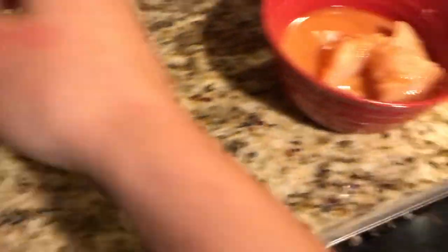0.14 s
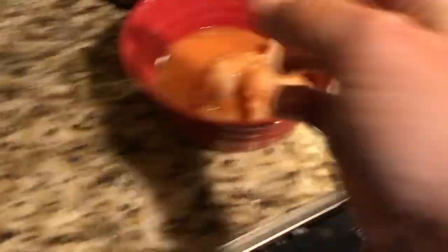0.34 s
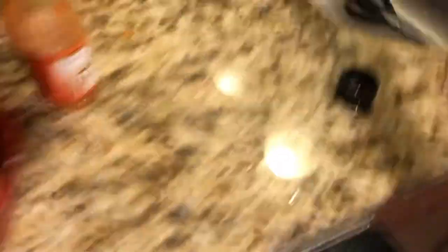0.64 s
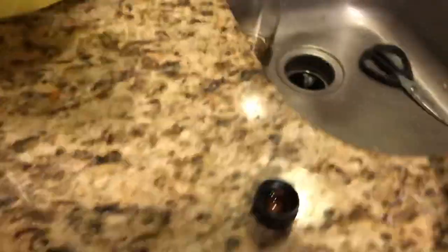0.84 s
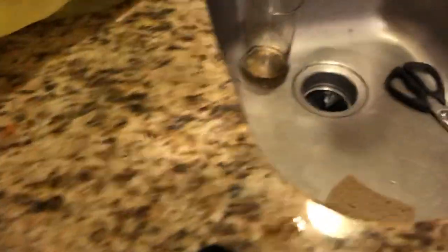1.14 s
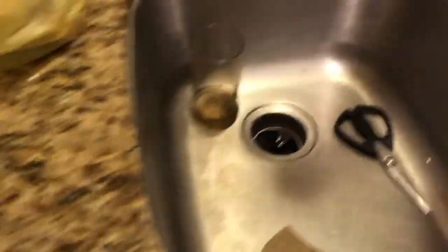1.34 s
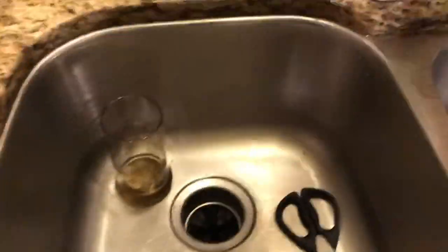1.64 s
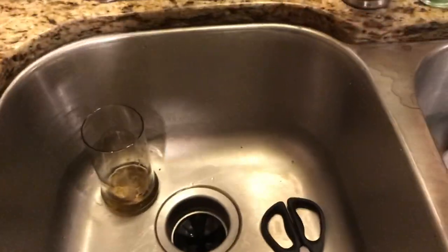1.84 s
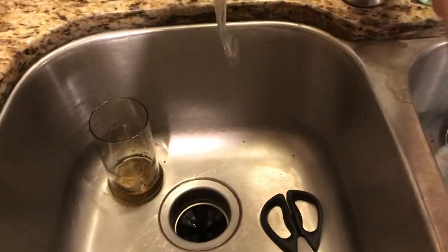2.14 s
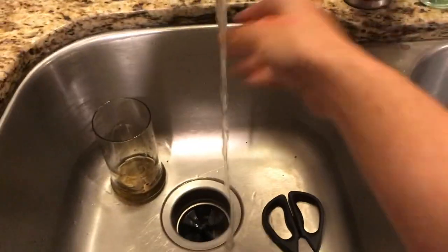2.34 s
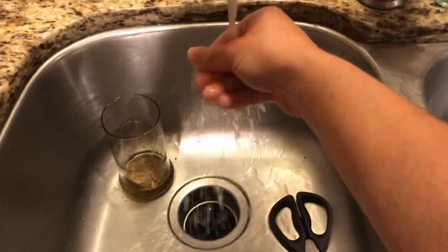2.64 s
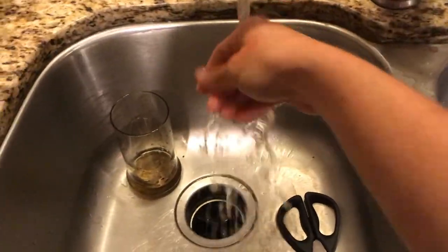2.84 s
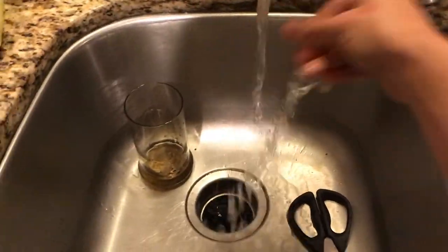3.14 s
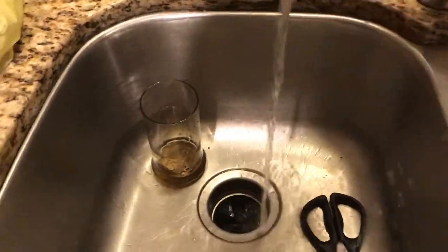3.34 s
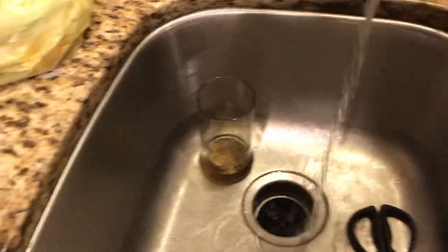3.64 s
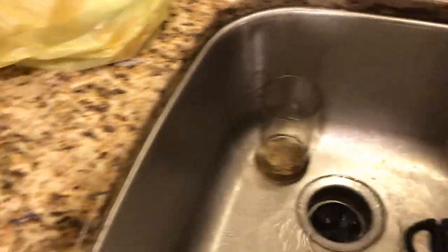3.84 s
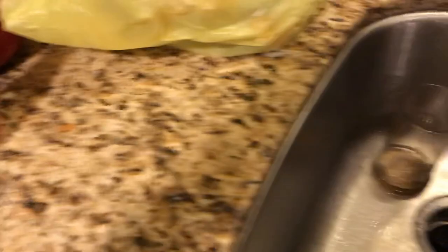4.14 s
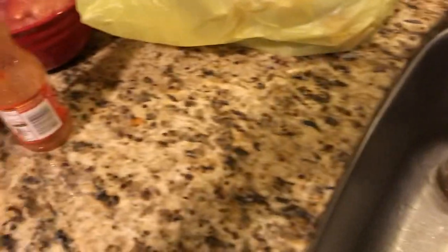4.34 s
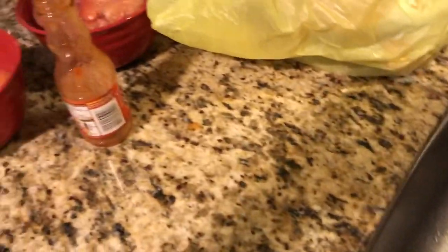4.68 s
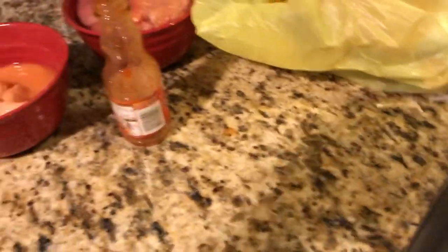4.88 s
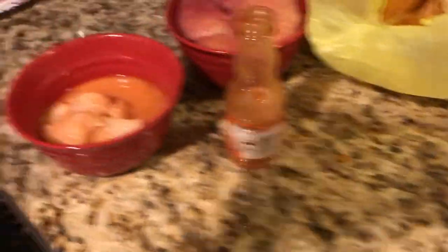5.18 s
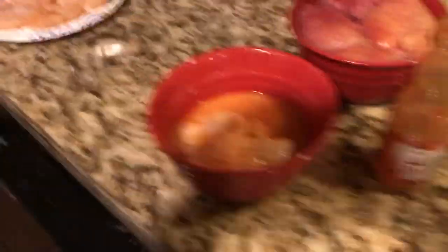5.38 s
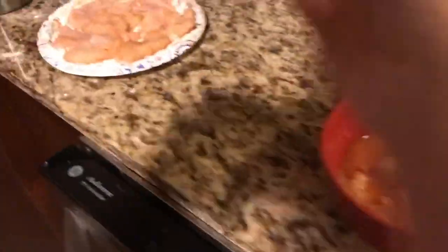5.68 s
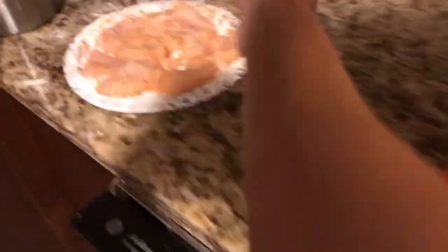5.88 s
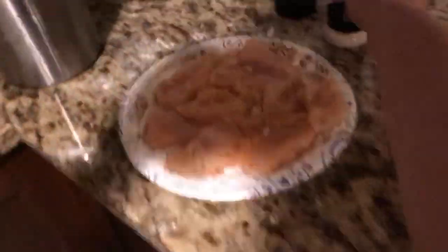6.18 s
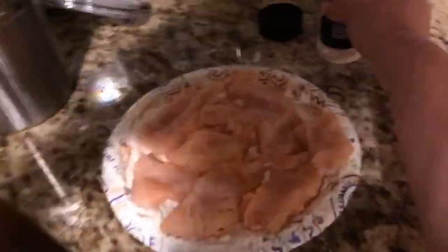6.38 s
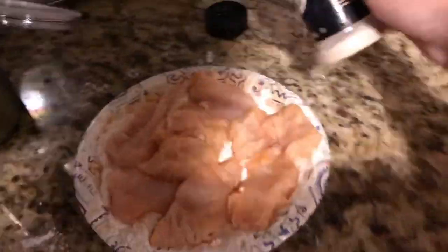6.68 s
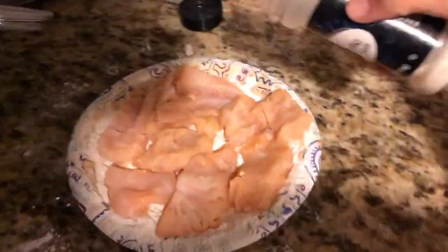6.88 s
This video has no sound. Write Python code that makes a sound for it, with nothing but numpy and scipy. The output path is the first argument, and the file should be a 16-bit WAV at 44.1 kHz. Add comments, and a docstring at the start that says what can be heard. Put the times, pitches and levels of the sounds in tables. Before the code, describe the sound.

Close in a quiet, faintly humming kitchen, light ticks, cloth rustle, soft knocks and a small metallic jingle come first, with a brief squeak. A tap opens and hisses into a steel sink; a hand breaks the stream into bright, irregular splats while the bowl drums hollowly. The tap shuts, a glass tings faintly under spray, drops dwindle, and quiet scuffing and ticks follow.

```python
"""Kitchen tap over a steel sink

A tap is opened over a steel sink; a hand breaks the jet into splats, then the tap is shut and drops fall.
The bowl drums under the jet (shaped noise) and an empty glass rings when spray hits it (fading sine tones).
Splats are slaps of noise with short rising bubbles; swells of noise add spatter to the last drops.
Before and after come cloth rustle and scuffing (the same kind of swells), a small metal jingle, soft knocks,
light ticks and a squeak, over the hum and hiss of a quiet kitchen."""
import sys
import numpy as np
from scipy import signal
from scipy.fft import rfft, irfft, next_fast_len
from scipy.io import wavfile
from scipy.ndimage import uniform_filter1d, map_coordinates

SR = 44100
rng = np.random.default_rng(int(sys.argv[2]) if len(sys.argv) > 2 else 0)


def inscribe(sig):
    """Save sig as 16-bit PCM at rate SR to the path in sys.argv[1].

    A 1-D sig is mono; a 2-D sig holds one channel per row.
    Samples are clipped to [-1, 1] before scaling.
    """
    pcm = np.round(np.clip(np.atleast_2d(sig).T, -1, 1) * 32767)
    wavfile.write(sys.argv[1], SR, pcm.astype(np.int16))


N = 309449
TIME = np.arange(N) / SR  # seconds


def amp(db):
    """Turn dB into gain."""
    return 10 ** (np.asarray(db) / 20)


def unit(x):
    """Scale to an rms of 1."""
    return x / np.sqrt(np.mean(x ** 2, axis=-1, keepdims=True) + 1e-20)


def along(points, hz):
    """Read a curve of (Hz, value) points on a log frequency axis."""
    f, v = np.transpose(points)
    return np.interp(np.log(hz + 1), np.log(f + 1), v)


def level(rows):
    """Gain per sample from (seconds, dB) rows, practically silent outside them."""
    s, db = np.transpose(rows)
    return amp(np.interp(TIME, s, db, left=-150, right=-150))


def wobble(rate):
    """A smooth random curve through `rate` random points a second."""
    knots = rng.standard_normal(int(N * rate / SR) + 4)
    return map_coordinates(knots, [TIME * rate])


def filtered(x, response):
    """Shape the spectrum of x by a response that depends on frequency."""
    m = next_fast_len(x.shape[-1] + 4096)  # spare room for the filter's ringing
    spectrum = rfft(x, m) * response(np.fft.rfftfreq(m, 1 / SR))
    return irfft(spectrum, m)[..., :x.shape[-1]]


def peak(f, hz, width_hz):
    """One resonance that rings on after its push, with a top gain of 1."""
    return 1j * f * width_hz / (hz * hz - f * f + 1j * f * width_hz + 1e-9)


def modes(table):
    """Several resonances side by side, with alternating signs."""
    return lambda f: sum((-1) ** k * amp(db) * peak(f, hz, w) for k, (hz, w, db) in enumerate(table))


def rush(response, patchy_db):
    """Noise of rms 1 whose gain varies in random patches of time and frequency."""
    z = signal.stft(rng.standard_normal(N), nperseg=512)[2]
    field = uniform_filter1d(rng.standard_normal(z.shape), size=8, axis=0)
    field = uniform_filter1d(field, size=6, axis=1)
    patches = amp(patchy_db * field / field.std())
    x = signal.istft(z * patches, nperseg=512)[1][:N]
    return unit(filtered(x, response))


def placed(times, sounds):
    """Add up rows of sound at their start times."""
    at = np.round(np.asarray(times) * SR).astype(int)[:, None] + np.arange(sounds.shape[1])
    return np.bincount(at.ravel(), sounds.ravel(), N + SR)[:N]


def rung(events, table, narrow_db):
    """Each blow rings all modes; those far from its favoured pitch lose narrow_db an octave."""
    s, db, favoured_hz = np.transpose(events)[..., None]
    t = np.arange(SR // 3) / SR
    octaves_off = np.abs(np.log2(np.transpose(table)[0] / favoured_hz))
    luck_db = rng.normal(0, 3.0, octaves_off.shape)
    attack = 1 - np.exp(-t / 0.00024)
    rings = []
    for hz, gain_db, t60 in table:
        blur = 0.79 * wobble(201)[:len(t)]  # wet or swinging, the ring is blurred
        rings.append(amp(gain_db - 60 * t / t60) * np.sin(2 * np.pi * hz * t + blur) * attack)
    return placed(s[:, 0], amp(db + luck_db - narrow_db * octaves_off) @ np.array(rings))


# Spectrum of the still kitchen. Each row: frequency in Hz, relative level in dB per Hz.
ROOM_SPECTRUM = [(15, -39), (25, -2), (49, -0.5), (72, -2.5), (161, -13.5), (199, -14.5), (391, -16),
                 (447, -21), (526, -21), (570, -20), (788, -23), (1180, -25), (2080, -31), (14100, -48.5),
                 (15700, -54)]
# Appliance hum. Each row: frequency in Hz, width in Hz, rms level in dB.
HUM_BANDS = [(43.5, 8, -62), (58.5, 2.3, -61), (396, 2, -68.5)]
ROOM_DB = -53.5  # rms


def kitchen():
    """Broad noise gives hiss and rumble; narrow bands of noise give a wavering hum."""
    sound = amp(ROOM_DB) * rush(lambda f: amp(along(ROOM_SPECTRUM, f)), patchy_db=1.0)
    for hz, width_hz, db in HUM_BANDS:
        sound = sound + amp(db) * rush(lambda f: peak(f, hz, width_hz), patchy_db=2.0)
    return sound


# Soft blows. Each row: start in seconds, level in dB, pitch in Hz, time to fade by 60 dB in seconds,
# level of overtone and puff in dB against the ring, rise in cycles of the pitch.
KNOCK_BLOWS = [(0.578, -41.5, 109, 0.15, -8.5, .4), (1.04, -45, 111.6, 0.3, -5.5, 0.36),
               (1.368, -29, 62.7, 0.3, -29, 1), (1.376, -52, 81.5, 0.66, -4.5, 1),
               (1.736, -34.5, 200, 0.032, -24, .4), (1.808, -30.5, 191, 0.08, -12.5, 0.23),
               (1.951, -32, 200, 0.06, -10, 0.42), (2.101, -41.5, 255, 0.086, -21, 0.66),
               (2.171, -47, 205, 0.22, -14, 0.6), (2.317, -40, 360, 0.064, -10.5, 0.47),
               (3.061, -34.5, 446, 0.051, -8, 0.51), (3.449, -28, 247, 0.08, -8.5, .3),
               (3.449, -40.5, 623, 0.052, 2, 0.29), (3.672, -34, 111, 0.067, -7, 0.3),
               (5.998, -41.5, 110, 0.11, -12, 0.46), (6.585, -47, 287, 0.21, -11.5, 0.36)]


def knocks():
    """Soft blows on cupboard, tap and bowl: a low ring, an overtone and a puff of noise above it."""
    s, db, hz, t60, puff_db, rise = np.transpose(KNOCK_BLOWS)[..., None]
    t = np.arange(SR // 3) / SR
    noise = rng.standard_normal((len(s), len(t)))
    puff = unit(filtered(noise, lambda f: peak(f, 2.2 * hz, 2.5 * hz) ** 2))
    overtone = np.sin(2 * np.pi * 1.95 * hz * t)
    ring = np.sin(2 * np.pi * hz * t) + amp(puff_db) * (overtone + puff)
    envelope = amp(db - 60 * t / t60) * (1 - np.exp(-t * hz / rise))
    return placed(s[:, 0], envelope * ring)


# Things lightly touched. Each row: start in seconds, level in dB, pitch of the dull tone in Hz,
# relative level of the bright part in dB, centre of the bright part in Hz.
TICK_TOUCHES = [(0.581, -46.5, 855, -31, 6000), (0.601, -59, 1090, -1, 9400),
                (0.682, -39.5, 750, -23, 9400), (0.741, -54.5, 762, 1.5, 6900), (0.752, -55, 940, -1, 9300),
                (0.791, -53, 1060, -4.5, 9500), (0.871, -41, 877, -18.5, 6900),
                (0.996, -47.5, 1430, -19, 8300), (1.022, -36, 834, -8, 9200), (1.037, -35, 750, -19, 9400),
                (1.059, -53, 910, -12, 9500), (1.206, -54, 2080, -1, 4000), (1.314, -40.5, 720, -16, 9500),
                (1.347, -38, 690, -29, 9400), (1.417, -52, 1150, -27, 9500), (5.706, -57.5, 1195, 0, 9500),
                (5.732, -55, 1340, -4.5, 7870), (5.873, -58.5, 728, -0.5, 6130),
                (5.981, -56.5, 1194, -20, 7000), (6.006, -45, 777, -6.5, 9700),
                (6.173, -42, 783, -6.5, 6600), (6.236, -53.5, 703, -3, 4300),
                (6.264, -49.5, 1430, -9, 7200), (6.273, -54, 1200, -5, 4300), (6.287, -62, 713, 2, 6100),
                (6.304, -54.5, 1360, -0.5, 4200), (6.315, -58, 877, 1, 4100), (6.336, -49, 1290, -20, 5600),
                (6.364, -53.5, 697, -8.5, 4400), (6.583, -55.5, 700, 1, 7400), (6.599, -56, 703, -9, 6240),
                (6.694, -54, 730, -9.5, 5980), (6.775, -47.5, 730, -8.5, 12900)]
TICK_T60_S = 0.035  # fade of the bright part; the dull tone fades faster still


def ticks():
    """Light contacts: a short dull tone of three sines and a bright scratch of noise."""
    s, db, hz, bright_db, bright_hz = np.transpose(TICK_TOUCHES)[..., None]
    t = np.arange(SR // 15) / SR
    noise = rng.standard_normal((len(s), len(t)))
    dull = np.sin(2 * np.pi * hz * t)
    dull += 0.76 * np.sin(2 * np.pi * 1.78 * hz * t)
    dull += .5 * np.sin(2 * np.pi * 2.21 * hz * t)
    dull *= 1.3 * amp(-60 * t / .025)  # wood and plastic stop ringing almost at once
    bright = unit(filtered(noise, lambda f: peak(f, bright_hz, 6600) ** 2))
    envelope = amp(db - 60 * t / TICK_T60_S) * (1 - np.exp(-t / 0.00074))
    return placed(s[:, 0], envelope * (dull + amp(bright_db) * bright))


# Swells of noise: cloth rustle and scuffing before and after, spatter of single drops from 4.3 to 5.2 s.
# Each row: time of the peak in seconds, bright level in dB, dull level in dB, rise in seconds,
# fall in seconds.
NOISE_SWELLS = [(0.6, -78, -63.5, .02, 0.37), (0.744, -74, -61.5, .15, 0.19),
                (1.001, -55.5, -62, 0.0078, 0.056), (1.029, -52, -50.5, 0.031, 0.19),
                (1.356, -72.5, -60, .3, 0.58), (1.752, -61.5, -85, .4, .25), (4.13, -71, -57.5, .2, .06),
                (4.33, -58, -71.5, .05, .05), (4.505, -59.5, -61.5, .2, 0.13), (4.721, -53, -54, .04, .035),
                (4.781, -57.5, -57.5, .01, .04), (5.149, -52.5, -77, .035, .035),
                (5.5, -67, -67.5, .5, 0.35), (5.69, -62.5, -66, .04, .2), (5.98, -66, -61.5, .02, 0.27),
                (6.3, -68, -64, .2, 0.073), (6.61, -58.5, -73.5, .05, 0.02), (6.98, -64, -71.5, .3, 0.37)]
# Spectrum of the bright noise. Each row: frequency in Hz, relative level in dB per Hz.
BRIGHT_SPECTRUM = [(1500, -4), (3000, -7.5), (6100, -4), (9000, -4.5), (10600, -14), (13000, -5.5),
                   (15700, -11)]
SWELL_SPAN_DB = 25  # level lost over one rise or fall time


def rustle_and_spatter():
    """Patchy bright noise and duller noise swell and fade together: rustle and scuffing, or spatter."""
    s, bright_db, dull_db, rise, fall = np.transpose(NOISE_SWELLS)
    late = TIME[:, None] - s
    swell = amp(-SWELL_SPAN_DB * np.maximum(-late / rise, late / fall))
    bright = rush(lambda f: amp(along(BRIGHT_SPECTRUM, f)), patchy_db=4.0)
    dull = rush(lambda f: peak(f, 950, 1700) ** 2, patchy_db=1.5)
    return swell @ amp(bright_db) * bright + swell @ amp(dull_db) * dull


# Blows on the metal piece. Each row: start in seconds, level in dB, pitch in Hz that the blow favours.
JINGLE_BLOWS = [(.601, -51, 10900), (.64, -56, 10500), (.707, -60, 9400), (.75, -58, 9400),
                (.81, -72, 9400), (1.027, -45, 9500), (1.06, -65, 9400), (1.12, -66, 9400),
                (1.18, -63, 9400), (1.232, -67, 9400), (1.316, -61, 9400), (1.372, -60.5, 9400)]
# Tones of a small metal piece. Each row: pitch in Hz, level in dB, time to fade by 60 dB in seconds.
METAL_TONES = [(9430, -7, 0.35), (9500, -11, 0.11), (9500, 0, 0.044), (13300, -5, 0.16)]


def jingle():
    """Small metal rings in high tones; it swings, so its level flutters."""
    return amp(3.9 * wobble(70.7)) * rung(JINGLE_BLOWS, METAL_TONES, narrow_db=36)


# Tones of a rubbed thing that sings. Each row: pitch in Hz, level in dB before the swell.
SQUEAK_TONES = [(1884, -65), (2051, -62), (2638, -76), (3580, -78), (3962, -71), (4086, -75), (4468, -76),
                (4840, -78), (5500, -79)]
# Swell of the squeak. Each row: time in seconds, gain in dB.
SQUEAK_GAIN = [(1.16, -16), (1.185, -1), (1.21, -3), (1.23, 5.5), (1.28, 3), (1.31, -5), (1.36, -16)]


def squeak():
    """A few unrelated, slightly unsteady tones swell and fade together."""
    tones = np.zeros(N)
    for hz, db in SQUEAK_TONES:
        strength = amp(db + 2.5 * wobble(40))
        shaky_time = TIME + .0002 * wobble(25)
        tones += strength * np.sin(2 * np.pi * hz * shaky_time + 1.2 * wobble(80))
    return level(SQUEAK_GAIN) * tones


# Hiss of the jet as it opens, flows and shuts. Each row: time in seconds, level in dB.
JET_LEVEL = [(1.99, -84), (2.045, -55.5), (2.19, -44.5), (2.25, -48.5), (2.45, -43), (2.55, -47),
             (2.68, -45.5), (2.8, -52), (2.9, -51), (3.07, -41.5), (3.12, -46), (3.45, -43), (3.55, -46.5),
             (3.85, -51), (4, -59), (4.17, -60.5), (4.21, -77.5)]
# Spectrum of the spray. Each row: frequency in Hz, relative level in dB per Hz.
SPRAY_SPECTRUM = [(410, -58.5), (700, -14.5), (908, -2.5), (1080, -7.5), (1630, -6.5), (1740, -11.5),
                  (2140, -5), (2320, -7), (3560, -8), (4800, -8), (5060, -10), (5620, -1.5), (10600, -5),
                  (12900, -5.5), (15700, 1)]
# Air ringing in spout and aerator. Each row: frequency in Hz, width in Hz, level in dB.
SPOUT_MODES = [(1190, 210, 0.5), (3550, 340, 7), (5500, 1300, -9.5), (13100, 1400, -7.5)]


def jet():
    """The jet hisses smoothly: noise with the spray's spectrum, lifted where the spout's air rings."""
    strength = level(JET_LEVEL) * amp(1.2 * wobble(50))
    spout = modes(SPOUT_MODES)
    spray = rush(lambda f: amp(along(SPRAY_SPECTRUM, f)) * (1 + 1.2 * np.abs(spout(f))), patchy_db=.8)
    return strength * spray


# The jet in bowl and drain. Each row: time in seconds, level in dB, hollow note of the drain in Hz.
DRUMMING = [(2.29, -83, 320), (2.32, -53.5, 313), (2.62, -50, 303), (2.68, -43, 308), (2.82, -52.5, 285),
            (3.064, -40.5, 275), (3.15, -46.5, 275), (3.43, -47, 277), (3.46, -36, 265), (3.55, -49, 292),
            (3.856, -49, 300), (4.05, -70, 300), (4.13, -55, 285), (4.2, -63, 300)]
# Low resonances of the bowl. Each row: frequency in Hz, width in Hz, level in dB.
BOWL_MODES = [(120, 20, -6), (225, 81, -1), (415, 240, 1.5), (540, 360, -2.5), (1180, 94, -10)]
SURGE_DB, HOLLOW_SWAY = 1.3, .03  # typical surge of the flow; typical sway of the hollow note, as a share


def bowl():
    """The uneven jet drums on sheet steel and blows across the drain, whose hollow note glides."""
    rows = np.array(DRUMMING)
    lumps = amp(3.6 * wobble(60))
    low_steel = modes(BOWL_MODES)
    sheet = unit(filtered(lumps * rng.standard_normal(N), lambda f: low_steel(f) * peak(f, 300, 900)))
    hollow_hz = np.interp(TIME, rows[:, 0], rows[:, 2])  # moves with the water
    hollow_hz = hollow_hz * (1 + HOLLOW_SWAY * wobble(20))
    turn = 2 * np.pi * np.cumsum(hollow_hz) / SR
    # two random strengths on sine and cosine make narrow noise on a gliding centre
    drain = unit(lumps * (wobble(70) * np.sin(turn) + wobble(70) * np.cos(turn)))
    surge = amp(SURGE_DB * wobble(22))
    return level(rows[:, :2]) * surge * (amp(-4) * sheet + amp(-2) * drain)


def bursts(db, centre_hz, spread, bubble_hz, t60):
    """A splat is a slap of noise around its centre and a short rising bubble, one row each."""
    t = np.arange(SR // 25) / SR
    noise = rng.standard_normal((len(db), len(t)))
    fade = amp(-60 * t / t60) + amp(-5.5 - 60 * t / 0.042)  # slap, then spray
    shape = (1 - np.exp(-t / 0.0011)) * fade
    shape = shape + 1.6 * np.exp(-((t - .001) / .0005) ** 2)  # the drop lands flat with a snap

    def tone(f):
        less_bass = f ** 4 / (f ** 4 + 1800 ** 4)
        return peak(f, centre_hz, 4.7 * spread * centre_hz) ** 3 * less_bass

    slap = filtered(noise * shape, tone)
    cycles = bubble_hz * t
    bubble = np.sin(2 * np.pi * cycles * (1 + 0.00075 * cycles))  # pitch rises
    bubble = bubble * np.exp(-cycles / 7) * (1 - np.exp(-cycles / 1.2))
    both = slap / np.abs(slap).max(axis=1, keepdims=True) + 0.53 * bubble
    return amp(db) * both / np.abs(both).max(axis=1, keepdims=True)


# Splats and larger drops. Each row: start in seconds, peak in dB before the steel colours it,
# starting pitch of the bubble in Hz, spread of the slap (roughly octaves).
SPLAT_HITS = [(2.3171, -24.5, 4040, .54), (2.3643, -19.5, 6500, .33), (2.3966, -30.5, 6370, .54),
              (2.4208, -22, 3100, .52), (2.4343, -15.5, 6500, .27), (2.4512, -20.5, 3410, .59),
              (2.4626, -28, 7000, .76), (2.479, -19.5, 5730, .53), (2.4886, -24.5, 8400, .61),
              (2.493, -22.5, 8480, .69), (2.5046, -14, 4500, .3), (2.5249, -24.5, 5560, .21),
              (2.538, -28, 3940, .45), (2.593, -18.5, 9500, .48), (2.626, -25, 2970, .51),
              (2.6416, -30, 8100, .28), (2.6953, -22, 10980, .78), (2.7061, -16.5, 5800, .26),
              (2.7135, -23, 7000, .15), (2.7495, -28.5, 12600, .77), (2.862, -20, 6430, .35),
              (2.8996, -24.5, 6750, .19), (2.9063, -23.5, 9050, .27), (2.9277, -14, 15000, .67),
              (2.9912, -28.5, 6500, .22), (2.9982, -25, 9860, .41), (3.0278, -24, 9300, .27),
              (3.0366, -21.5, 15000, .37), (3.0461, -14, 6240, .27), (3.0564, -13.5, 3610, 0.6),
              (3.0916, -17.5, 4620, .55), (3.1191, -19.5, 9000, .47), (3.1272, -18, 6660, .14),
              (3.135, -22, 9000, .57), (3.1432, -20, 8500, .24), (3.15, -20, 5540, .46),
              (3.165, -21.5, 6300, .2), (3.1771, -14.5, 4370, .56), (3.2039, -17.5, 13700, .2),
              (3.2288, -23, 9300, .63), (3.2384, -23.5, 6290, .26), (3.2459, -21, 11460, .25),
              (3.2636, -19.5, 6100, .38), (3.2994, -13, 3540, 1.06), (3.3292, -23, 6500, .7),
              (3.3772, -27, 6300, .48), (3.396, -23.5, 8050, .37), (3.4154, -3.5, 6360, .44),
              (3.4348, -26, 6400, .23), (3.449, -28.5, 4730, .64), (3.495, -24.5, 13000, .3),
              (3.511, -30.5, 8600, .12), (3.5703, -27.5, 8870, .2), (3.6208, -25.5, 9000, .29),
              (3.6732, -19, 11100, .26), (3.6855, -27, 9000, .3), (3.7102, -21, 8100, .13),
              (3.731, -29, 11200, .3), (3.7634, -29, 7800, .24), (3.7705, -12, 5800, .26),
              (3.7784, -30, 8150, .37), (3.853, -22.5, 14300, .18), (3.8835, -15.5, 8600, .4),
              (3.9465, -32.5, 11200, .55), (3.9678, -33, 4600, .15), (3.9748, -34, 6920, .43),
              (4.07, -45, 6500, .55), (4.1312, -47.5, 2080, .76), (4.3295, -42, 6070, .18),
              (4.367, -42.5, 13310, .92), (4.453, -38, 7840, .75), (4.4716, -45, 5670, .64),
              (4.504, -32, 5240, .52), (4.5127, -32, 11020, .63), (4.5234, -41.5, 6640, .79),
              (4.541, -41.5, 6700, .91), (4.615, -47, 8000, 0.32), (4.6287, -47, 8300, .3),
              (4.643, -49, 3440, .78), (4.7136, -30.5, 9000, .4), (4.7245, -40.5, 2630, 1.1),
              (4.778, -44, 3050, .9), (4.7957, -45.5, 6600, .27), (4.833, -44.5, 9430, .15),
              (4.9852, -46, 14000, .67), (4.9939, -46.5, 10980, .18), (5.0524, -49, 6700, .2),
              (5.096, -49.5, 10600, .2), (5.1481, -34.5, 13300, .23), (5.2198, -48.5, 6680, .47),
              (5.2579, -50.5, 10770, .3), (5.4825, -48.5, 2020, .62)]
# How densely small drops fall. Each row: time in seconds, drops per second.
PATTER_RATE = [(2.28, 0), (2.4, 210), (3.8, 210), (4.05, 70), (4.17, 60), (4.2, 0), (4.26, 70), (4.9, 50),
               (5.6, 0)]
# High resonances of the bowl. Each row: frequency in Hz, width in Hz, level in dB.
STEEL_MODES = [(2280, 180, -8), (2760, 130, -13.5), (3730, 510, -0.5), (4257, 210, -18.5), (6550, 380, 0.5),
               (8370, 150, 2.5), (10100, 96, -4.5), (10900, 59, -15), (12300, 2300, -2.5),
               (14700, 170, -11)]
SLAP_HZ, SLAP_FOLLOWS = 7360, 0.96  # centre of a slap's noise, and how far (power) it follows the bubble
DRIP_BASE_DB, DRIP_FADE_DB_PER_S = -65, 4  # drips after the jet, before random size, and how they dwindle


def splashes():
    """Large splats and a random patter of small drops, coloured by the ringing steel."""
    s, db, bubble_hz, spread = np.transpose(SPLAT_HITS)[..., None]
    centre_hz = SLAP_HZ * (bubble_hz / SLAP_HZ) ** SLAP_FOLLOWS
    big = placed(s[:, 0], bursts(db, centre_hz, spread, bubble_hz, t60=0.011))

    # the running count of drops gives each drop its time
    count = np.cumsum(np.interp(TIME, *np.transpose(PATTER_RATE))) / SR
    luck = rng.random((int(count[-1]), 5)).T[..., None]
    s = np.interp(np.arange(luck.shape[1]) + luck[0, :, 0], count, TIME)
    drip_db = DRIP_BASE_DB - DRIP_FADE_DB_PER_S * (s - JET_LEVEL[-1][0])
    jet_db = np.interp(s, *np.transpose(JET_LEVEL))
    flow_db = np.where(s < JET_LEVEL[-2][0], jet_db, drip_db)
    size_db = flow_db[:, None] + 3.5 + 14 * luck[1] ** 2  # more flow, larger drops
    centre_hz = 5000 * 2.8 ** luck[2]
    bubble_hz = centre_hz * (.8 + .4 * luck[4])
    small = placed(s, bursts(size_db, centre_hz, .15 + .4 * luck[3], bubble_hz, t60=.012))

    steel = modes(STEEL_MODES)
    return filtered(big + small, lambda f: 0.88 + 0.61 * np.abs(steel(f)))


# Direct hits on the glass. Each row: start in seconds, level in dB, pitch in Hz that the spot favours.
GLASS_HITS = [(3.893, -48, 3580), (3.915, -48.5, 6560), (3.945, -59, 9000), (4.055, -55.5, 6740),
              (4.06, -58, 3580), (4.37, -61, 3580), (4.575, -63, 6800), (4.6, -66, 5200), (4.8, -63, 6860),
              (4.99, -64, 5230), (4.33, -53.5, 6020), (4.332, -54, 7000), (4.418, -54, 6640),
              (4.57, -60, 5200), (5.222, -57, 5250), (5.24, -60, 6900), (5.34, -58.5, 5900)]
# Tones of the empty glass. Each row: pitch in Hz, level in dB, time to fade by 60 dB in seconds.
GLASS_TONES = [(3580, 2, 0.1), (5360, -2, 0.1), (6040, 5.5, 0.099), (6060, 3, 0.054), (6600, 4.5, 0.062),
               (6940, 2, 0.069), (9000, 16, 0.055)]


def glass():
    """Spray hits the glass, which rings mostly in the tones near the pitch that the spot favours."""
    return rung(GLASS_HITS, GLASS_TONES, narrow_db=72)


def walls(x, t60, wet_db):
    """Add a short tail of fading noise, as from the bowl and the tiles."""
    t = np.arange(SR // 4) / SR
    tail = rng.standard_normal(len(t)) * amp(-60 * t / t60) * (t > .002)
    return x + amp(wet_db) * signal.fftconvolve(x, tail / np.linalg.norm(tail))[:N]


def scene():
    """Splashes, knocks, ticks, glass and jingle share the tail; the rest is added without it."""
    near = splashes() + knocks() + ticks() + glass() + jingle()
    echoing = walls(near, t60=.15, wet_db=-13.5)
    return (echoing + bowl() + jet() + rustle_and_spatter() + squeak() + kitchen())[None]


TOP_HZ = 15850  # nothing is kept from here up


def record(dry):
    """Weaken the deepest bass and cut everything above the band limit."""
    return filtered(dry, lambda hz: (hz < TOP_HZ) / (1 + (34 / (hz + 1)) ** 6))


dry = scene()
out = record(dry)
inscribe(out)
```